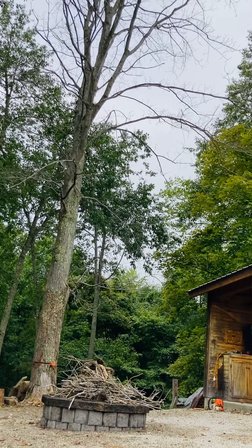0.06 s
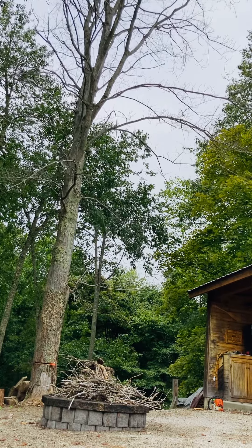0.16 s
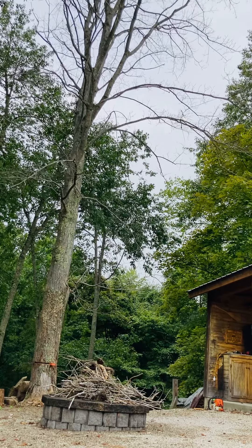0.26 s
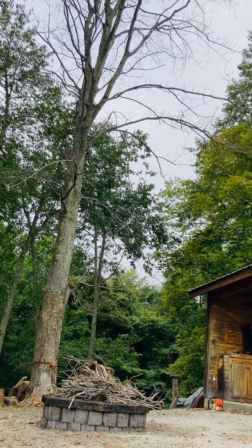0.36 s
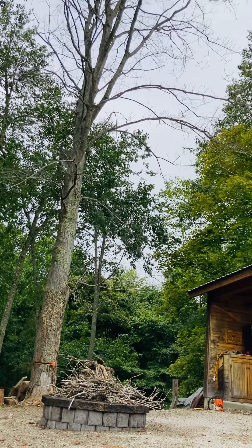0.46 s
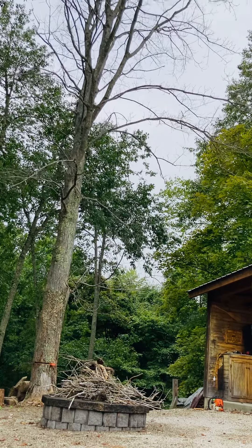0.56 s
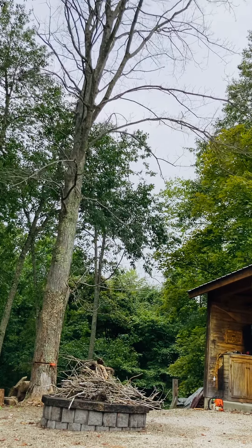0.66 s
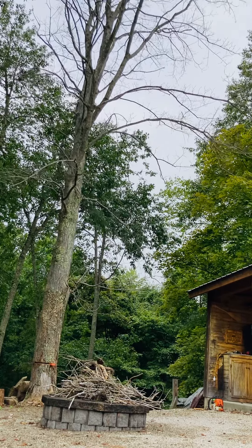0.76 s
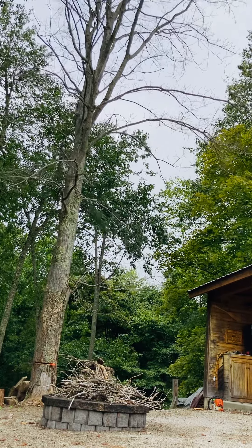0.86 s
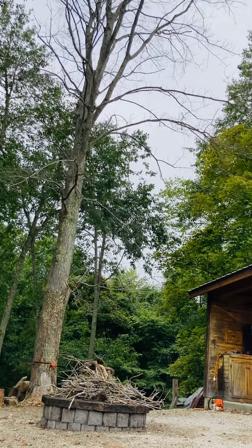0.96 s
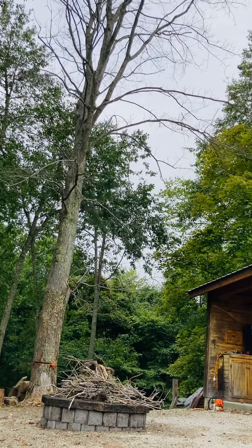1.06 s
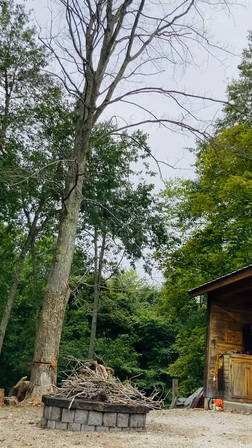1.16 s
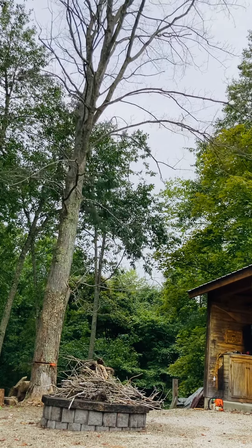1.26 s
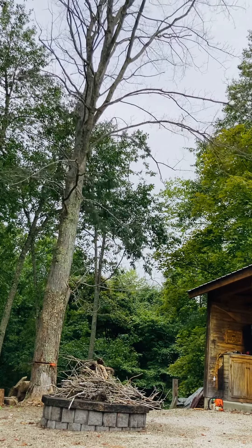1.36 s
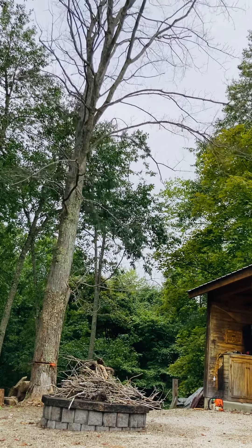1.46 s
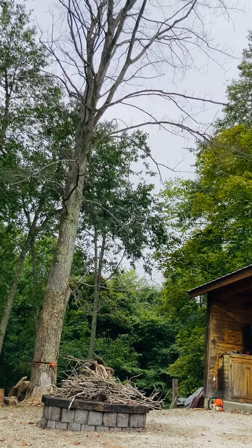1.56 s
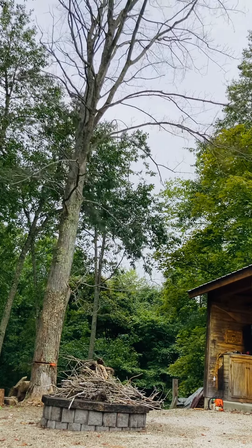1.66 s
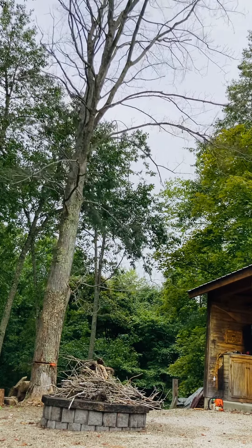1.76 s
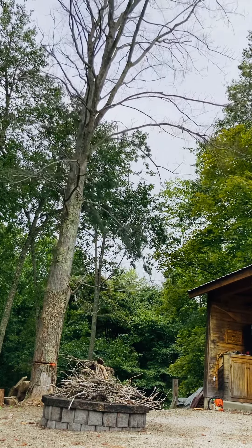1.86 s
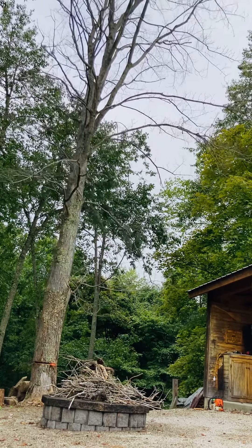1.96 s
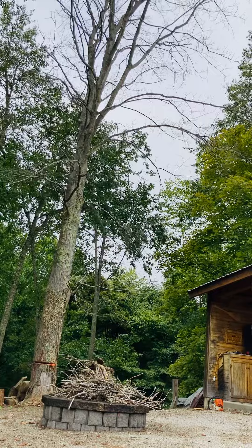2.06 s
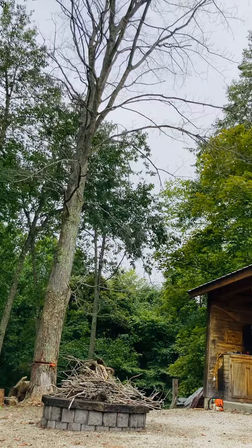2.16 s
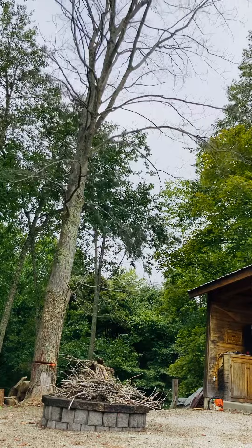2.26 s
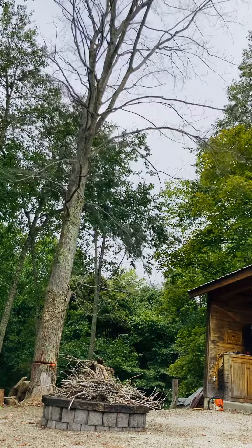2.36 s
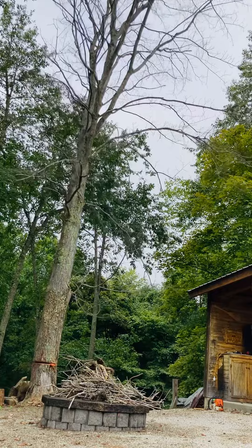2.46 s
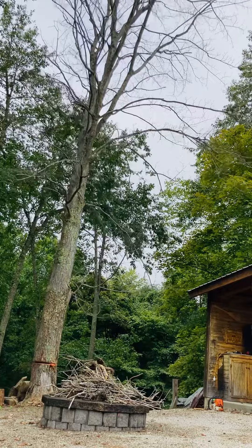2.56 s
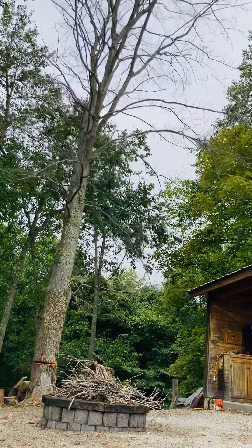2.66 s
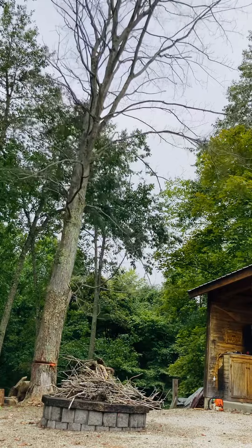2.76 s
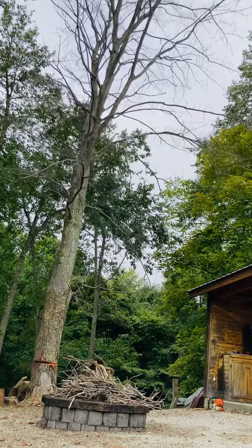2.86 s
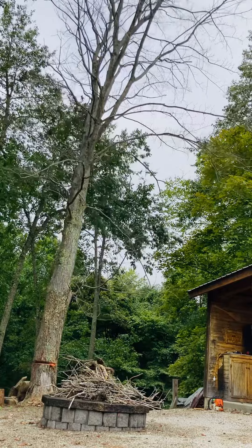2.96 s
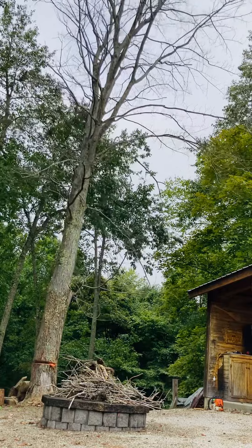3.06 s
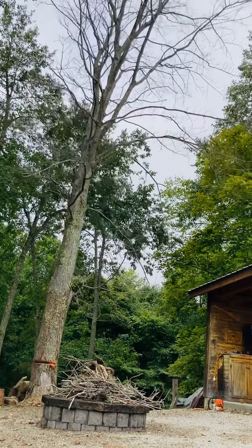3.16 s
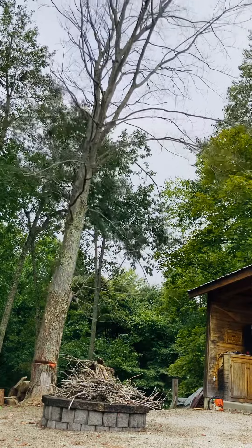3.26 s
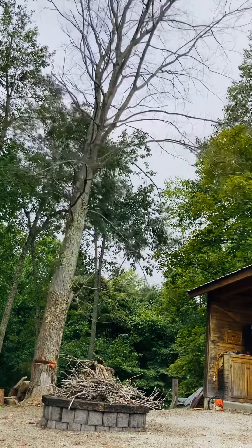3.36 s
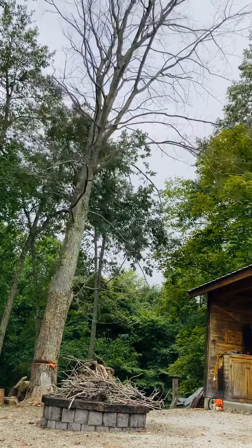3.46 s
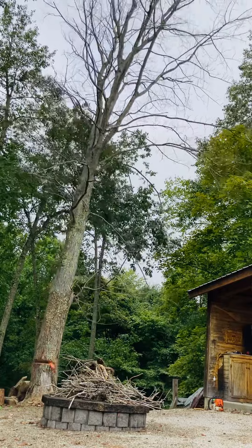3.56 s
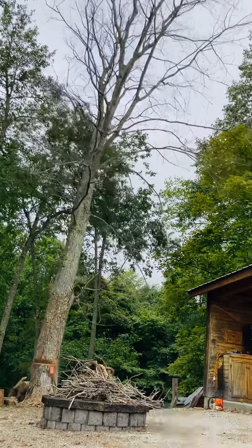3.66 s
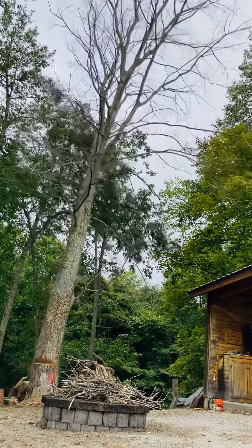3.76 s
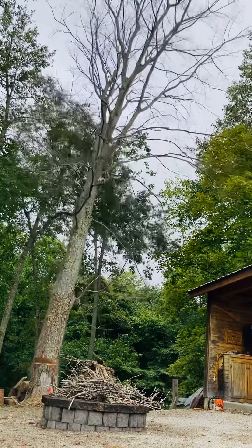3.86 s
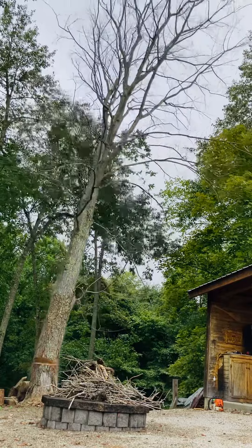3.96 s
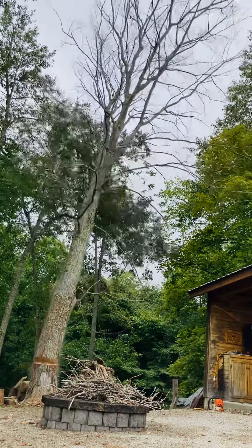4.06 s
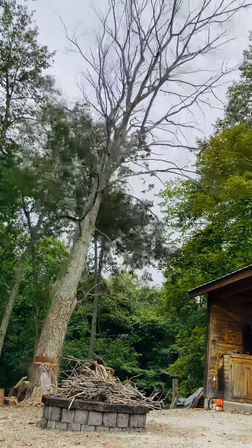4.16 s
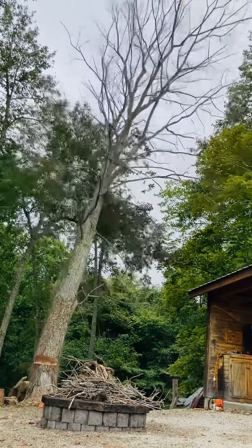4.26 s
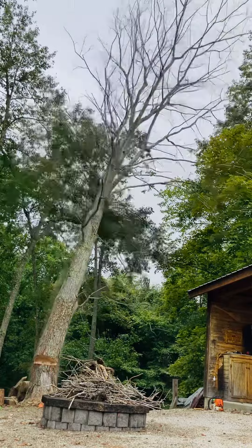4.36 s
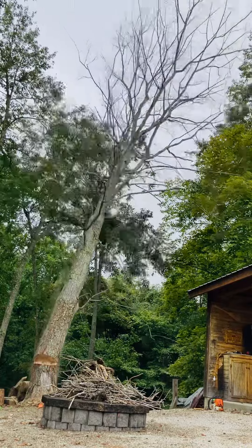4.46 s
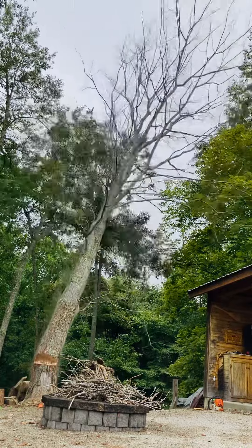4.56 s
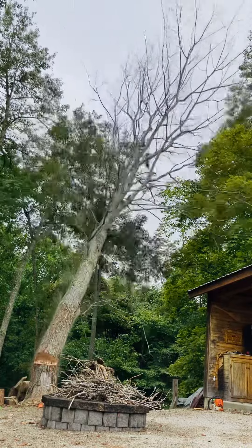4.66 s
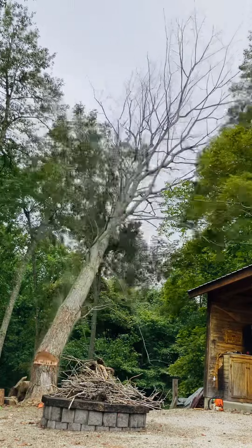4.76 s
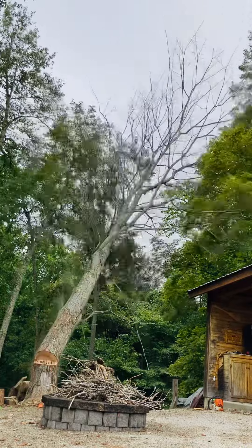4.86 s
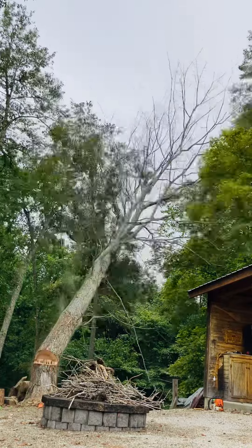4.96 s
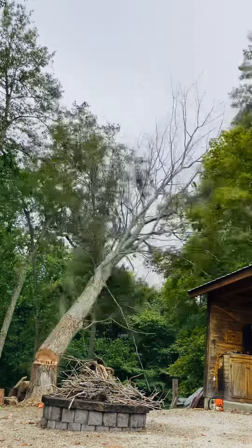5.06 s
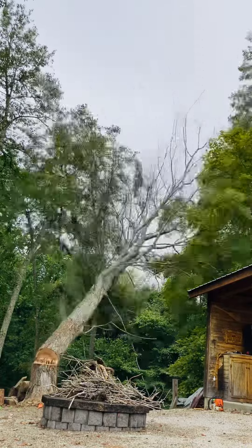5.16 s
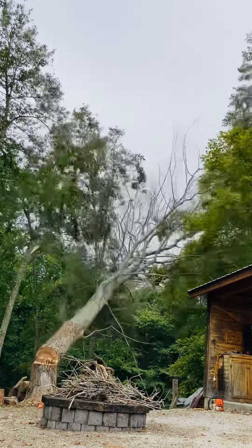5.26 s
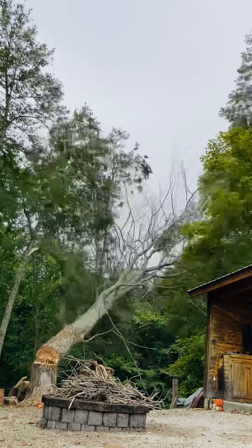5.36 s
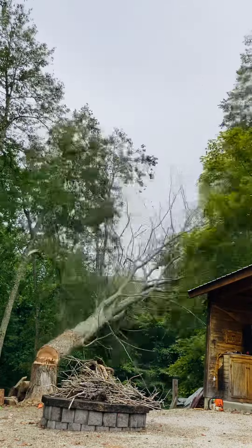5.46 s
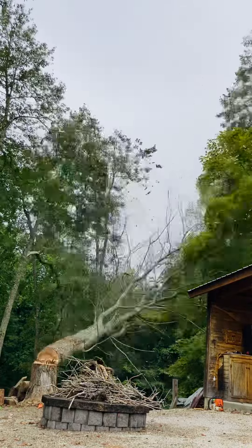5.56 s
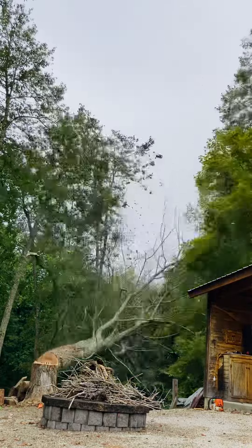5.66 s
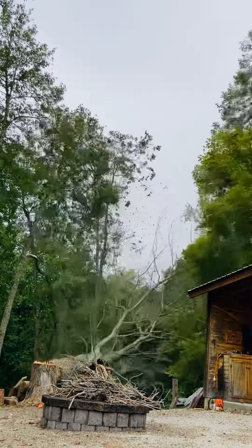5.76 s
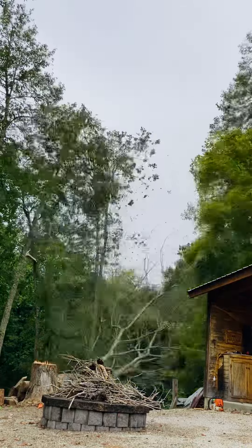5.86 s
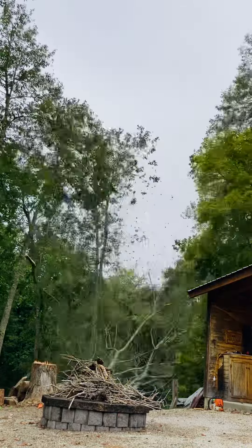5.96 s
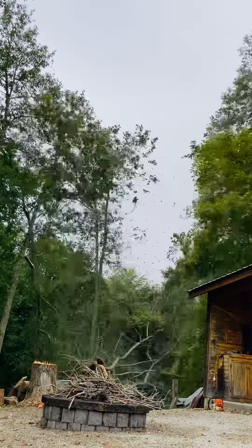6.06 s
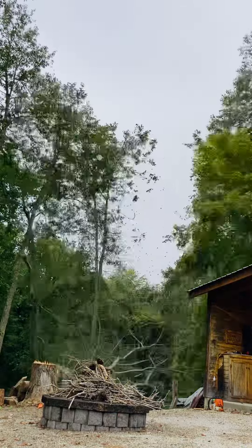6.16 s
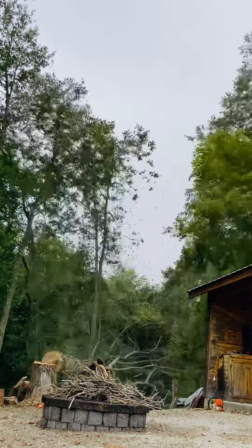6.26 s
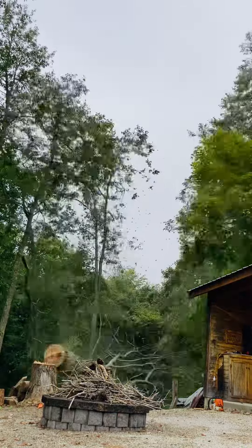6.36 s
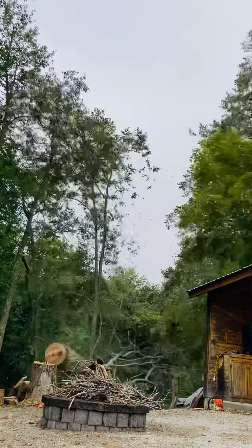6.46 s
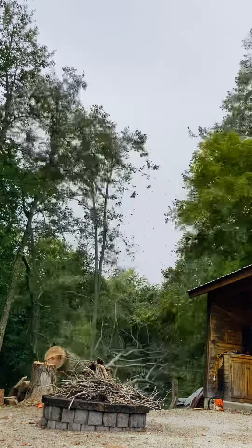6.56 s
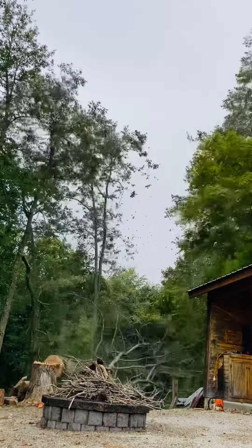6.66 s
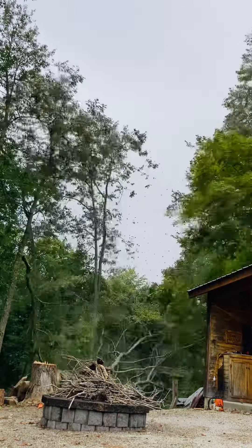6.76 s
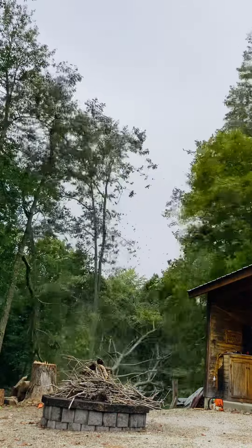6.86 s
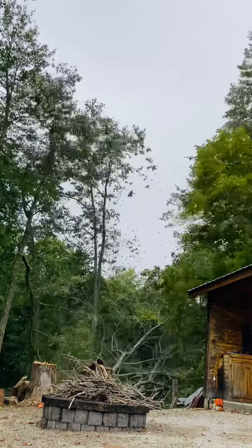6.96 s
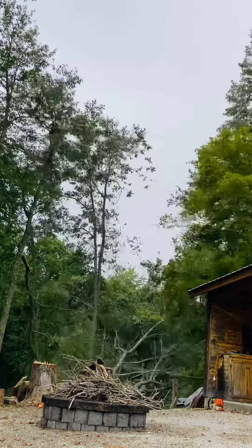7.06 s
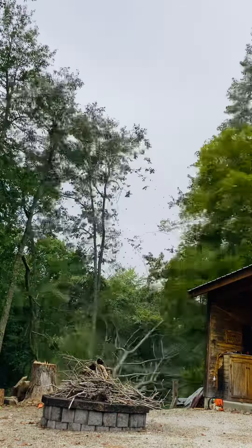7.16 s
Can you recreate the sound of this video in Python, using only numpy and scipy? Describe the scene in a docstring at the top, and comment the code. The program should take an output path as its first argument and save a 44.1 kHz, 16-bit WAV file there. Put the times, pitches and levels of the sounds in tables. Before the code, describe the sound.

Isolated fibre ticks give way to hard, ringing wood cracks and a short creak before the trunk lets go with a deep knock. Leaves patter, then roar while twigs and boughs snap and a limb groans. Clustered low thuds and soil crunch mark the landing, followed by fading rustle and a soft roll. Open forest clearing, distant idling engine, stereo microphone standing back, quick scattered woody echoes.

```python
"""A wooded clearing where a dead tree is felled, with an engine idling far off and insects in the leaves.
The hinge of wood ticks, cracks and tears: filtered impulses and short noise bursts, trailed by ringing tones.
The crown sweeps through its neighbours: hissing, pattering noise, ringing twigs, snapping branches, a scrape, a groan.
The trunk thuds, bounces and rolls: sine waves sinking in pitch, a low punch, crunching wood and a soil rumble.
A shed and the forest edge throw every crack back: short echoes and a scattered tail."""
import sys
import numpy as np
from scipy import signal
from scipy.fft import rfft, irfft
from scipy.io import wavfile
from scipy.ndimage import uniform_filter1d

SR = 44100
rng = np.random.default_rng(int(sys.argv[2]) if len(sys.argv) > 2 else 0)


def wav_out(sig):
    """Save sig, one row per channel (or a flat mono array), as 16-bit PCM at SR to the path in sys.argv[1]."""
    wavfile.write(sys.argv[1], SR, np.round(np.clip(np.atleast_2d(sig).T, -1, 1) * 32767).astype(np.int16))


N = 318402
TIME, HZ = np.arange(N) / SR, np.fft.rfftfreq(N, 1 / SR)


def amp(db):
    """Decibels to a linear gain."""
    return 10 ** (np.asarray(db) / 20)


def evened(x):
    """The signal scaled to an rms of 1."""
    return x / np.sqrt(np.mean(x ** 2) + 1e-20)


def read(points, hz):
    """A curve given as points, read at any pitch along a logarithmic axis."""
    point_hz, value = np.transpose(points)
    return np.interp(np.log(hz + 1), np.log(point_hz + 1), value)


def add(mix, s, sound):
    """Lay a sound into the mix from second s, cut off at the end."""
    part = mix[..., max(round(s * SR), 0):][..., :sound.shape[-1]]
    part += sound[..., :part.shape[-1]]


def drift(rate_hz):
    """Slow random movement of rms 1: noise with its fast changes removed."""
    return evened(irfft(rfft(rng.standard_normal(N)) * np.exp(-(HZ / rate_hz) ** 2), N))


def swell(start, hold, db, rise_db_per_s, fall_db_per_s):
    """Attack, hold and release as a gain over time, straight in dB."""
    before = np.maximum(start - TIME, 0)
    after = np.maximum(TIME - start - hold, 0)
    return amp(db - rise_db_per_s * before - fall_db_per_s * after)


def causal(spectrum, size=2048):
    """The frequency response of a body with this spectrum that rings only after it is struck."""
    log_gain = np.log(amp(read(spectrum, abs(np.fft.fftfreq(size, 1 / SR)))))
    return np.exp(np.conj(signal.hilbert(log_gain)))[:size // 2 + 1]


def colour(pair, spectrum):
    """Filter a pair through a body with this spectrum, then bring it to an rms of 1."""
    response = irfft(causal(spectrum, size=4096))
    return evened(signal.oaconvolve(pair, response[None], axes=1)[:, :N])


# Likeness of scattered sound at the two microphone ports.
# Each row: frequency in Hz, likeness from 0 (unrelated) to 1 (the same).
PORT_LIKENESS = [(100, 1), (400, 0.96), (900, 0.31), (1900, 0.62), (2600, 0.031), (4200, 0.194),
                 (5600, 0.62), (7200, 0.68), (8200, 1), (10000, 0.66), (11800, 1), (13200, 1), (15000, 0.4)]


def spread(pair):
    """Two unrelated signals turn into scattered sound, partly alike at the two ports."""
    angle = np.arcsin(np.clip(read(PORT_LIKENESS, HZ), 0, 1)) / 2
    z = rfft(pair)
    return irfft(np.cos(angle) * z + np.sin(angle) * z[::-1], N)


def clicks(per_s, range_db, cap, splinter_s=0.00042, count=6):
    """Random fractures, many small and a few large, each a tiny burst of one of several shapes."""
    size = amp(range_db * np.minimum(rng.exponential(1, (2, N)), cap))
    size *= rng.random((2, N)) < per_s / SR
    kind = rng.integers(0, count, (2, N))
    t = np.arange(256) / SR
    shapes = rng.standard_normal((count, 1, len(t))) * np.exp(-t / splinter_s)
    bursts = (signal.oaconvolve(size * (kind == k), shapes[k], axes=1)[:, :N] for k in range(count))
    return evened(sum(bursts))


def sticks(per_s, range_db, cap, cycles, low_hz, high_hz, count=28):
    """Dry sticks break at random; each rings for a few cycles at its own pitch, and a few are large."""
    out, t = np.zeros((2, N)), np.arange(1024) / SR
    for hz in np.geomspace(low_hz, high_hz, count):
        size = amp(range_db * np.minimum(rng.exponential(1, 256), cap))
        when = np.cumsum(rng.exponential(count / per_s, 256))
        side = rng.uniform(0, 2 * np.pi, 256)
        ping = np.sin(2 * np.pi * hz * t) * np.exp(-hz * t / cycles) * hz / high_hz
        for s, gain, angle in zip(when[when < TIME[-1]], size, side):
            add(out, s, gain * np.outer([np.cos(angle), np.sin(angle)], ping))
    return evened(out)


def scatter(start, end, per_s, spread_db, size=96):
    """Chance fractures at uneven intervals: rows of (s, wood dB, tick dB), the levels around 0."""
    when = start + np.cumsum(rng.exponential(1, size)) / per_s
    strengths_db = spread_db * rng.standard_normal((size, 2))
    return np.column_stack([when, strengths_db])[when < end]


def mottle(pair, depth_db, width_hz, life_s, size=512):
    """Short-lived resonances: now one pitch stands out, now another."""
    hz, t, z = signal.stft(pair, SR, nperseg=size, noverlap=size * 3 // 4)
    field = rng.standard_normal((len(t), len(hz))).T
    for axis, reach in enumerate([width_hz / hz[1], life_s / t[1]]):
        bell = np.exp(-(np.arange(-size // 16, size // 16 + 1) / reach) ** 2)
        field = signal.fftconvolve(field, np.expand_dims(bell, 1 - axis), "same")
    gain = evened(amp(depth_db * evened(field)))
    return signal.istft(z * gain, SR, nperseg=size, noverlap=size * 3 // 4)[1][:, :N]


# How long the forest's echo lasts.
# Each row: frequency in Hz, time to die by 60 dB in seconds.
FOREST_DECAY = [(100, 0.02), (500, 0.33), (1600, 0.37), (4000, 0.55), (9000, 0.33), (15000, 0.42)]


def forest(pair, count=4):
    """Trunks and leaves scatter the sound into a tail, each band dying at its own speed, by ever-changing paths."""
    taps = rng.standard_normal((count, 2, SR // 2)) * (rng.random((count, 2, SR // 2)) < 5000 / SR)
    hz, t, z = signal.stft(taps, SR, nperseg=256)
    dying = amp(-60 * t / read(FOREST_DECAY, hz)[:, None])
    tails = signal.istft(z * dying, SR, nperseg=256)[1]
    tails *= np.clip(np.arange(tails.shape[-1]) / SR / 0.0024, 0, 1) ** 2
    tails /= np.linalg.norm(tails, axis=-1, keepdims=True)
    # the sound is handed round the paths 11 times a second
    turn = 11 * TIME - np.arange(count)[:, None] / count
    paths = np.maximum(np.cos(2 * np.pi * turn), 0)
    return sum(signal.oaconvolve(pair * path, tail, axes=1)[:, :N] for path, tail in zip(paths, tails))


# Near reflections; of the sharp ticks, only the flat shed wall gives a strong return.
# Each row: delay in seconds, wood gain in dB, tick gain in dB.
NEAR_ECHOES = [(.0083, -10.5, -12.5), (.0099, -12.5, -28), (.0132, -10.5, -27), (.025, -20, -27),
               (.031, -19, -29)]


def reflected(wood, ticks):
    """The ground, the shed and near trunks return single echoes, whose delays wander by a few percent."""
    out = np.zeros((2, N))
    for delay, wood_db, tick_db in NEAR_ECHOES:
        path_s = delay * (1 + .03 * drift(6))
        heard_from = TIME - np.round(path_s * SR) / SR
        sent = amp(wood_db) * wood + amp(tick_db) * ticks
        out += np.array([np.interp(heard_from, TIME, x) for x in sent])
    return out


LEAD_IN_S = .004  # room for the first fibres before the main break


def snap(spectrum, db, tear_s, ragged, lag_s, vary=0.079, size=2048):
    """One break amid smaller fibres, at two ports; bending waves bring the treble first and the bass last."""
    t, hz = np.arange(size) / SR - LEAD_IN_S, np.fft.rfftfreq(size, 1 / SR)
    fibres = rng.standard_normal((2, size)) * np.exp(np.minimum(t / (0.44 * tear_s), -t / tear_s))
    # a few fibres are much thicker than the rest
    fibres *= amp(5 * np.repeat(rng.standard_normal(size // 16), 16))
    main_break = np.exp(-2j * np.pi * hz * LEAD_IN_S)
    force = main_break + ragged * rfft(fibres / np.linalg.norm(fibres, axis=1, keepdims=True))
    # each piece of wood rings at its own pitch
    thickness = np.exp(vary * rng.uniform(-0.84, 1))
    body = causal(np.array(spectrum) / [thickness, 1], size=size)
    bending = np.exp(-4j * np.pi * lag_s * np.sqrt(1000 * hz))
    wave = irfft(force * body * bending)
    # the level is the rms of each port over 5 ms, on average
    return amp(db) * wave / np.linalg.norm(wave) * np.sqrt(2 * .005 * SR)


WOOD_HZ = 1600  # where a crack of the hinge usually peaks


def pitched(spectrum, ratio, tilt_db):
    """The spectrum of a thinner or thicker piece of wood, tilted by so many dB an octave."""
    hz, db = np.transpose(spectrum)
    return np.column_stack([hz * ratio, db + tilt_db * np.log2(hz / WOOD_HZ)])


LET_GO_S = 3.72  # from here the tree falls freely


def falling(onset_s=0.032):
    """0 while the tree stands, 1 once it falls freely."""
    return np.clip((TIME - LET_GO_S) / onset_s + 1, 0, 1)


# The idling engine and its rattles.
# Each row: frequency in Hz, rms level in dB around which it wavers.
ENGINE_IDLE = [(41.2, -50.5), (88.5, -63.5), (123.5, -52), (135.5, -59), (206, -67.5), (247, -66),
               (275, -70), (331, -69.5)]
# The engine hum sinks for about two seconds during the fall, then recovers.
# One row: deepest from in seconds, for seconds, share of the hum lost in dB, onset and recovery in dB/s.
ENGINE_SINK = (4, 1.91, -4.5, 14, 14)
# Colours of the still air and of the insects.
# Each row: frequency in Hz, relative level in dB.
AIR_COLOUR = [(18, -37), (45, -20), (65, -1), (110, -6), (170, 1.5), (220, -5.5), (280, -6.5), (450, -16),
              (750, -22), (1500, -17), (2600, -22.5), (4200, -26), (6000, -41), (10000, -25), (13200, -26),
              (15700, -32)]
INSECT_COLOUR = [(3500, -26), (5500, -9), (7000, -4), (7600, -0.5), (8100, -5.5), (8800, -7.5),
                 (10000, -32)]


def clearing():
    """A far engine of wavering sines idles under still air and a thin, fluttering chorus of insects."""
    revolved_s = np.cumsum(1 + .003 * drift(3)) / SR
    idle = np.zeros(N)
    for hz, db in ENGINE_IDLE:
        level = np.sqrt(2) * amp(db + .3 * drift(4.6))
        idle += level * np.sin(2 * np.pi * (hz * revolved_s + rng.random()))
    idle *= 1 - np.minimum(swell(*ENGINE_SINK), 1)
    air = amp(-51.0) * colour(rng.standard_normal((2, N)), AIR_COLOUR)
    chorus = colour(rng.standard_normal((2, N)), INSECT_COLOUR)
    insects = amp(-52.5) * chorus * amp(1.5 * drift(53))
    return idle + spread(air + insects)


# The crown brushes two neighbours, hits the undergrowth and rebounds.
# Each row: full contact in seconds, hold in seconds, leaf level in dB, twig level in dB.
CROWN_BRUSHES = [(3.79, 0.04, -59, -43.5), (3.943, 0.081, -41.5, -41), (4.264, 0.55, -36.5, -46),
                 (4.868, 0.16, -33.5, -47.5), (5.133, 0.38, -26.5, -34), (5.49, 0.031, -27, -46),
                 (5.762, 0.37, -30, -41.5), (6.077, 0.17, -25.5, -38.5), (6.79, 0.018, -36.5, -52.5),
                 (6.992, 0.13, -35.5, -60.5)]
BRUSH_RISE_DB_PER_S, LEAF_FALL_DB_PER_S, TWIG_FALL_DB_PER_S = 64, 32, 49


def contact():
    """How hard the crown works on leaves and on twigs: the brushes add in power."""
    leaves, twigs = np.zeros((2, N))
    for s, hold, leaf_db, twig_db in CROWN_BRUSHES:
        leaves += swell(s, hold, leaf_db, BRUSH_RISE_DB_PER_S, LEAF_FALL_DB_PER_S) ** 2
        twigs += swell(s, hold, twig_db, BRUSH_RISE_DB_PER_S, TWIG_FALL_DB_PER_S) ** 2
    return falling() * np.sqrt([leaves, twigs])


# Once the crown is down, the undergrowth screens its highest hiss.
# One row: start in seconds, fade in seconds, final gain of the top in dB.
HISS_SCREEN = (5.85, .2, -3)
SCREEN_HZ = 11000


def screened(pair):
    """The top of the treble fades as the leaves sink behind the undergrowth."""
    start, over_s, db = HISS_SCREEN
    top = irfft(rfft(pair) / (1 + (SCREEN_HZ / (HZ + 1)) ** 10), N)
    return pair + top * (amp(db * np.clip((TIME - start) / over_s, 0, 1)) - 1)


# Colours of the leaves, the breaking twigs and the whoosh.
# Each row: frequency in Hz, relative level in dB.
LEAF_COLOUR = [(300, -19), (1200, -1.5), (2800, -1.5), (4600, -3.5), (6000, 0), (7400, -3), (8500, 1.5),
               (13000, -1.5), (14500, -3), (15700, -12), (16200, -41)]
TWIG_COLOUR = [(200, -28.5), (550, -11), (760, 1.5), (1100, 1.5), (1500, -1), (1950, 2), (2500, -13.5),
               (3600, -7.5), (5000, -39), (10000, -53), (15000, -50)]
WHOOSH_COLOUR = [(50, -35), (120, -7.5), (172, -2.5), (215, -5.5), (300, -17.5), (700, -43.5)]
# The bare crown whooshing through the air.
# One row: full from in seconds, for seconds, level in dB, rise in dB/s, fall in dB/s.
CROWN_WHOOSH = (4.5, 1.9, -47.5, 3, 36)
# single leaves stand out at first, then merge into a rush (dB against the hiss)
PATTER_FIRST_DB, PATTER_MERGE_DB_PER_S, PATTER_LAST_DB = 19, 23, -5.5


def crown(leaf_gain, twig_gain):
    """Leaves hiss and patter while twigs break in clumps and bare limbs whoosh."""
    hiss = colour(rng.standard_normal((2, N)), LEAF_COLOUR) * amp(0.63 * drift(51))
    taps = colour(clicks(per_s=900, range_db=2.0, cap=2.8, splinter_s=0.00023), LEAF_COLOUR)
    patter = taps * evened(amp(4.9 * drift(62.6)))
    merging_db = PATTER_FIRST_DB - PATTER_MERGE_DB_PER_S * (TIME - LET_GO_S)
    single = amp(np.maximum(merging_db, PATTER_LAST_DB))
    leaves = (hiss + single * patter) / np.sqrt(1 + single ** 2)
    breaking = sticks(per_s=330, range_db=4.5, cap=2.9, cycles=4.5, low_hz=520, high_hz=3700)
    twigs = colour(breaking, TWIG_COLOUR) * evened(amp(2.3 * drift(52)))
    near = leaf_gain * screened(leaves) + twig_gain * twigs
    rush = mottle(near + amp(-2.5) * forest(near), depth_db=1.7, width_hz=124, life_s=0.018)
    whoosh = falling() * swell(*CROWN_WHOOSH) * colour(rng.standard_normal((2, N)), WHOOSH_COLOUR)
    return spread(rush + whoosh)


# Limbs dragging through the neighbouring trees.
# One row: full from in seconds, for seconds, level in dB, rise in dB/s, fall in dB/s.
SCRAPE_SWELL = (4, 2.5, -41, 200, 40)
# Its colour. Each row: frequency in Hz, relative level in dB.
SCRAPE_COLOUR = [(150, -18), (400, 2.5), (650, 3.5), (950, -10.5), (1600, -1), (2300, -9), (3200, 4),
                 (4500, -7), (6200, -11), (9000, 0.5), (14000, -14), (16500, -40)]


def scraping():
    """Limbs drag through the neighbouring trees, stripping bark and stems in quick uneven spurts."""
    spurts = evened(amp(2.4 * drift(60)))
    splinters = clicks(per_s=300, range_db=5, cap=2.9, splinter_s=.0005)
    grains = colour(splinters, SCRAPE_COLOUR) * spurts
    dragged = falling() * swell(*SCRAPE_SWELL) * grains
    return spread(mottle(dragged, depth_db=1.6, width_hz=150, life_s=0.014))


# A leaning limb judders along another; with a negative hold the fall begins before the rise ends.
# One row: rise ends in seconds, hold in seconds, level in dB without that overlap, rise and fall in dB/s.
GROAN_SWELL = (5.5, -0.07, -31, 150, 60)
GROAN_HZ, GROAN_WANDER, GROAN_WIDTH_HZ = 843, 0.05, 110  # the wander is a share of the pitch


def groan():
    """Uneven slips of one limb on another ring a resonance that wanders as the contact slides."""
    slips = clicks(per_s=260, range_db=5, cap=2.5)
    wandering_hz = GROAN_HZ * (1 + GROAN_WANDER * drift(10))
    turn = np.exp(2j * np.pi * np.cumsum(wandering_hz) / SR)
    # shift the moving resonance down to 0 Hz, filter there and shift it back
    rung = turn * signal.lfilter(*signal.butter(2, GROAN_WIDTH_HZ / 2, fs=SR), slips / turn)
    return spread(swell(*GROAN_SWELL) * evened(rung.real))


# The larger branches breaking in the crown.
# Each row: start in seconds, wood crack level in dB, splinter tick level in dB,
# decay of the wood's tearing in seconds, brightness in dB per octave.
BRANCH_BREAKS = [(3.7465, -36, -39, .004, -4), (3.804, -34, -32, .005, -1), (3.821, -37, -37, 0.0044, 4),
                 (3.8992, -35, -33, 0.0086, 1), (3.9187, -35, -24.5, .006, 4), (3.9275, -31, -26, .004, -1),
                 (3.9655, -29.5, -29, 0.0052, 2), (3.9822, -37, -26.5, .004, 4.5),
                 (4.0175, -37, -38, .004, 2), (4.0262, -35, -26.5, .011, 5),
                 (4.0705, -26.5, -24, 0.0039, 0), (4.094, -28.5, -22.5, .0054, 4),
                 (4.1035, -38, -26, 0.0077, -2), (4.1375, -38, -35, .004, 2), (4.143, -35, -30, .007, 2),
                 (4.2, -46, -41, .004, -3), (4.2186, -28.5, -33, 0.0036, 3.5), (4.235, -42, -28, 0.0055, 0),
                 (4.2435, -34, -26.5, .005, 0.5), (4.2948, -49, -30, 0.004, -2),
                 (4.303, -45, -29, 0.0031, 3), (4.3222, -38, -27, 0.0068, -1),
                 (4.388, -30, -30, .008, -1.5), (4.3986, -30, -23.5, 0.0071, 1.5),
                 (4.4688, -30.5, -40, 0.0051, -3.5), (4.5093, -39, -32, 0.0053, 1),
                 (4.5336, -31.5, -35, .006, -1.5), (4.557, -37, -26.5, 0.0073, -1),
                 (4.9045, -18, -19, 0.0077, 3), (4.9096, -29, -19.5, 0.006, 4),
                 (5.033, -19.5, -40.5, 0.0069, -1.5), (5.1039, -21.5, -37.5, 0.0088, -1.5),
                 (5.1261, -23, -33.5, .0049, -1), (5.1507, -16, -33.5, 0.007, -2.5),
                 (5.175, -25, -33, .007, 1), (5.185, -21.5, -32, 0.0062, -0.5),
                 (5.196, -25, -40, .005, -2.5), (5.2326, -24, -34, .0087, -4), (5.2925, -30, -38, .0037, 1),
                 (5.3055, -16.5, -20, 0.011, 0.5), (5.338, -23, -19, .0052, 0),
                 (5.352, -19.5, -23, .007, -2), (5.3752, -16, -25, 0.0036, 0),
                 (5.385, -21, -32, 0.0042, -3.5), (5.4105, -18.5, -24, 0.0022, 5),
                 (5.4135, -15.5, -22, 0.0022, 5), (5.447, -32, -33, .005, -2),
                 (5.4861, -18.5, -16.5, 0.022, 3), (5.5301, -18.5, -14, .0083, -1),
                 (5.5365, -23, -31, .005, 1), (5.5497, -26, -18, .0083, 0), (5.5655, -19.5, -15, 0.0092, 0),
                 (5.579, -27, -30, .006, -6), (5.592, -27, -28, 0.0056, -5),
                 (5.6135, -22, -21.5, 0.0096, 6), (5.6415, -28.5, -22.5, 0.0071, 3),
                 (5.6845, -33, -28, .0041, 1), (5.7035, -27, -27, .006, 0),
                 (5.7215, -22.5, -22.5, .0103, -0.5), (5.7541, -26, -22, .007, -1),
                 (5.829, -28, -40, 0.0046, -5), (5.841, -23.5, -38, 0.0066, -3),
                 (6.0406, -29, -25, .0064, -1), (6.081, -27.5, -29, .0093, 7),
                 (6.1598, -42, -22, .0025, -1), (6.213, -29, -23, .005, 7), (6.2753, -26, -16.5, .017, 6),
                 (6.5165, -42, -20, .012, 4), (6.5254, -29.5, -16.5, 0.023, 3.5)]
# What a breaking bough and its splinters ring with; the splinters serve the hinge too.
# Each row: frequency in Hz, relative level in dB.
BOUGH_COLOUR = [(200, -25.5), (520, -14), (740, 2), (900, -1.5), (1120, 3.5), (1500, -3.5), (1950, 3),
                (2500, -8.5), (3500, -2.5), (5000, -28.5), (10000, -52)]
SPLINTER_COLOUR = [(900, -60), (3000, -8), (5500, 2.5), (7000, -2), (8600, 3.5), (10500, 5), (13000, 1.5),
                   (15000, -10), (17000, -55)]
# small branches snap at random, as hard as the crown presses on twigs and leaves (levels in dB against those)
SNAPS_PER_S, SNAPS_END_S, SNAP_WOOD_DB, SNAP_TICK_DB, SNAP_SPREAD_DB = 24, 5.8, 3, 0, -1
SNAP_TEAR_S = 0.004


def branches(leaf_gain, twig_gain):
    """Dead limbs break off in the crown, some dull and some bright, with small ones in between."""
    (wood, ticks), breaks = np.zeros((2, 2, N)), list(BRANCH_BREAKS)
    for s, wood_db, tick_db in scatter(LET_GO_S, SNAPS_END_S, SNAPS_PER_S, SNAP_SPREAD_DB):
        twig_db = 20 * np.log10(np.interp(s, TIME, twig_gain))
        leaf_db = 20 * np.log10(np.interp(s, TIME, leaf_gain))
        small_wood_db = twig_db + SNAP_WOOD_DB + wood_db
        small_tick_db = leaf_db + SNAP_TICK_DB + tick_db
        breaks.append((s, small_wood_db, small_tick_db, SNAP_TEAR_S, 0))
    for s, wood_db, tick_db, tear_s, tilt_db in breaks:
        bough = pitched(BOUGH_COLOUR, 0.99, tilt_db)
        crack = snap(bough, wood_db, tear_s=tear_s, ragged=2.16, lag_s=.0004, vary=0.087)
        tick = snap(SPLINTER_COLOUR, tick_db, tear_s=.42 * tear_s, ragged=1.6, lag_s=0.000323)
        add(wood, s - LEAD_IN_S, crack)
        add(ticks, s - LEAD_IN_S, tick)
    direct = wood + ticks
    near = amp(-4) * reflected(wood, ticks)
    return spread(direct + near + amp(-6.5) * forest(direct))


# Blows of the trunk and its heavy limbs.
# Each row: start in seconds, strength in dB (wave and punch are played below it), first pitch in Hz,
# pitch it sinks towards in Hz, rise in seconds, time to die by 60 dB in seconds, crunch level in dB.
TRUNK_BLOWS = [(2.599, -25, 559, 288, 0.00064, 0.068, -34.5), (3.5949, -9, 720, 45, .0006, 0.064, -18.5),
               (3.805, -33, 329, 140, .00066, 0.093, -42), (4.903, -24, 260, 165, 0.0012, 0.09, -38),
               (5.636, -29, 455, 304, .0007, 0.07, -33), (6.029, -23, 520, 200, .001, .03, -27),
               (6.0364, -14, 470, 60, 0.0028, 0.046, -20.5), (6.0462, -11, 300, 110, 0.0011, 0.061, -25),
               (6.0629, -9.5, 394, 35, 0.0034, 0.044, -27), (6.127, -19, 300, 95, 0.0036, .08, -27.5),
               (6.1347, -21, 380, 110, .001, 0.046, -35), (6.2, -22, 300, 110, .003, 0.074, -31),
               (6.244, -27, 425, 172, .002, .06, -36), (6.8, -27, 634, 110, .00125, 0.054, -28),
               (6.9093, -19.5, 420, 43.7, .005, 0.25, -34.5), (6.956, -23, 131, 37.7, .003, 0.62, -31.5)]
# Limbs plough into the soil as the crown and trunk land, settle and roll.
# Each row: full from in seconds, hold in seconds, soil rumble level in dB, wood crunch level in dB.
SOIL_PLOUGHS = [(5.966, 0.03, -33.5, -33), (6.036, 0.036, -28, -35), (6.113, 0.024, -31, -33),
                (6.172, 0.025, -35, -37), (6.235, 0.043, -35.5, -38.5), (6.415, 0.079, -40, -44.5),
                (6.784, 0.042, -44.5, -47), (6.988, 0.11, -42.5, -53), (7.135, 0.028, -44, -53)]
PLOUGH_RISE_DB_PER_S, PLOUGH_FALL_DB_PER_S = 349, 166
# Colours of the low punch, the soil, and wood crushed against it.
# Each row: frequency in Hz, relative level in dB.
PUNCH_COLOUR = [(18, -17.5), (45, -1.5), (110, 3), (250, -4), (600, -50), (3000, -86.5)]
SOIL_COLOUR = [(20, -5), (55, 0.5), (110, 2.5), (180, -0.5), (300, 2), (480, -6.5), (750, -26), (1600, -13),
               (6000, -69)]
CRUNCH_COLOUR = [(30, -44), (100, -20), (250, 1), (400, -4.5), (540, -2.5), (700, -14.5), (1500, -27),
                 (5000, -73)]
LIMB_RUMBLE_DB = -6.5  # bending limbs rumble in step with the breaking twigs, against their level


def ground(twig_gain):
    """Limbs plough the soil; each trunk blow crunches, punches and sends out a wave that sinks in pitch."""
    t, blows = np.arange(SR // 2) / SR, np.zeros((2, N))
    for s, db, first_hz, last_hz, rise_s, t60, crunch_db in TRUNK_BLOWS:
        hz = last_hz + (first_hz - last_hz) / (1 + t / 0.002)  # the soil carries high pitches fastest
        wave = np.sin(2 * np.pi * np.cumsum(hz) / SR) * (1 - np.exp(-t / rise_s))
        add(blows, s, amp(db - 4.5 - 60 * t / t60) * wave)
        punch = snap(PUNCH_COLOUR, db - 14.5, tear_s=0.0088, ragged=0.13, lag_s=0.00062, size=4096)
        add(blows, s - LEAD_IN_S, punch[0])  # long waves are the same at both ports
        crushed = snap(CRUNCH_COLOUR, crunch_db, tear_s=0.0034, ragged=2.3, lag_s=0.00094)
        add(blows, s - LEAD_IN_S, crushed)
    rumble = colour(clicks(per_s=700, range_db=1.5, cap=3.16), SOIL_COLOUR) * amp(1.7 * drift(22))
    breaking = sticks(per_s=600, range_db=3.0, cap=3.4, cycles=2.82, low_hz=220.3, high_hz=685.0)
    crunch = colour(breaking, CRUNCH_COLOUR)
    soil, wood = np.zeros((2, N))  # powers
    for s, hold, soil_db, wood_db in SOIL_PLOUGHS:
        soil += swell(s, hold, soil_db, PLOUGH_RISE_DB_PER_S, PLOUGH_FALL_DB_PER_S) ** 2
        wood += swell(s, hold, wood_db, PLOUGH_RISE_DB_PER_S, PLOUGH_FALL_DB_PER_S) ** 2
    strain = np.sqrt(soil + (amp(LIMB_RUMBLE_DB) * twig_gain) ** 2)
    return spread(blows + strain * rumble + np.sqrt(wood) * crunch + amp(-11.5) * forest(blows))


SLIP_WOBBLE = .1  # how unevenly the wood slips, as a share of the pitch


def creak(length, hz, db, swell_db):
    """Fast uneven slips that grow until the wood lets go."""
    t = np.arange(int(length * SR)) / SR
    wobble = evened(uniform_filter1d(rng.standard_normal(len(t)), 30))
    slips = np.sin(2 * np.pi * np.cumsum(hz * (1 + SLIP_WOBBLE * wobble)) / SR)
    grip = evened(amp(2 * evened(uniform_filter1d(rng.standard_normal(len(t)), 40))))
    growth = amp(db + swell_db * (t / length - 1))
    return np.sqrt(2) * slips * grip * growth * signal.windows.tukey(len(t), .15)


# Ringing tones after every knock and crack of the hinge, the lower ones about 100 Hz apart as from a close echo.
# Each row: frequency in Hz, gain at the peak in dB before the mix, time to die by 60 dB in seconds.
RINGING_TONES = [(392, -10, 0.11), (510, -12, 0.065), (593, -20, 0.053), (720, -8, 0.064), (812, 1, 0.13),
                 (1190, -7, 0.033), (1434, -11, 0.08), (1615, -1, 0.023), (1850, -10, 0.031),
                 (2560, -18, 0.06), (3280, 2, 0.028)]


def ring(pair):
    """Ringing tones set off by the sound, each a dying cosine with its own gain at its peak."""
    t = np.arange(SR // 8) / SR
    response = np.zeros(len(t))
    for hz, db, t60 in RINGING_TONES:
        rate = np.log(1000) / t60
        response += amp(db) * 2 * rate / SR * np.exp(-rate * t) * np.cos(2 * np.pi * hz * t)
    return signal.oaconvolve(pair, response[None], axes=1)[:, :N]


# The louder fibres of the hinge breaking.
# Each row: start in seconds, trunk knock, wood crack and splinter tick level in dB before the mix,
# pitch of the crack in Hz, its brightness in dB per octave, decay of the crack's tearing in seconds.
HINGE_FIBRES = [(0.058, -50, -34.5, -34, 1580, 6.5, 0.0042), (0.881, -73, -60, -44, 1594, -0.5, 0.0022),
                (0.9485, -68, -51, -38, 1610, 8, .002), (1.1317, -66.5, -57, -43.5, 1604, 0.5, 0.00205),
                (1.4287, -70.5, -55, -39.5, 1590, 0, 0.0023), (1.7108, -70, -51, -44, 1620, -2, 0.00206),
                (1.758, -69, -60, -37, 1600, -0.5, 0.0021), (1.7727, -46, -31.5, -20, 1760, 1, 0.0029),
                (1.875, -75, -44.5, -32.5, 1596, 4.5, 0.0019), (2.2837, -38.5, -27.5, -22, 1730, 3, 0.0052),
                (2.3208, -61.5, -37.5, -25.5, 1700, 4, 0.0032), (2.406, -65, -56.5, -43, 1600, 0.5, .002),
                (2.4986, -65, -42, -41, 1630, 0, 0.0051), (2.5064, -67, -37, -36, 1640, 5.5, 0.0019),
                (2.5695, -70, -59, -36.5, 1580, -1, 0.0021), (2.6515, -31.5, -19, -20.5, 1850, 0.5, 0.0028),
                (2.7355, -60, -41, -40, 1800, 2, .003), (2.7723, -40.5, -28.5, -22, 1597, 2, 0.0029),
                (2.7943, -33, -15.5, -16, 1640, 1.5, 0.0042), (2.8022, -20, -15.5, -21, 1394, 1, 0.0054),
                (2.8727, -28.5, -20, -20.5, 1623, -2.5, 0.0039), (2.9028, -37.5, -47, -22, 1600, 1, 0.0033),
                (3.0645, -18.5, -16, -22.5, 1580, 0, 0.0059), (3.0873, -19.5, -16, -21, 1500, -1, 0.0035),
                (3.1508, -60, -42, -35, 1600, 1, .002), (3.2035, -65, -50, -36, 1600, 1, .002),
                (3.2356, -18.5, -15.5, -17, 1458, 0, 0.0029), (3.261, -50, -33, -29, 1700, 4, 0.0022),
                (3.3004, -25.5, -19, -21.5, 1530, 0, 0.0035), (3.3425, -57, -26.5, -26.5, 1900, 4, 0.0039),
                (3.3492, -33, -29, -29, 1300, 2, 0.0028), (3.359, -55, -40, -35, 1600, -3, .002),
                (3.3896, -20.5, -15.5, -18, 1595, 1.5, 0.0027), (3.4173, -24.5, -18, -27, 1740, -1, 0.0018),
                (3.453, -31, -19, -18.5, 1880, 0.5, 0.004), (3.5127, -42, -28, -31, 1690, 3, .003),
                (3.5188, -14.5, -14, -23, 1550, 1.5, 0.0045), (3.5411, -16, -15.5, -25, 1400, 0, 0.0025),
                (3.5928, -38, -19, -22.5, 1560, -2.5, 0.0058), (3.7251, -55, -40, -38, 1498, -4, 0.004),
                (3.761, -45.5, -31.5, -40, 1470, -2.5, 0.004), (3.795, -42.5, -24, -26.5, 1500, 2, 0.0082)]
# Wood slipping on wood until it lets go.
# Each row: start in seconds, length in seconds, pitch in Hz, level it grows to in dB, swell in dB.
HINGE_CREAKS = [(2.786, .0125, 1787, -27.5, 14), (3.051, 0.021, 1632, -22, 15),
                (3.58, .0175, 1580, -11.5, 15.5)]
# Colours of the trunk knock and the wood crack.
# Each row: frequency in Hz, relative level in dB.
KNOCK_COLOUR = [(40, -29), (150, -13), (320, -9), (450, -0.5), (570, -1), (750, -7), (900, -23.5),
                (1150, -5), (2500, -40), (9000, -102)]
WOOD_COLOUR = [(250, -15.5), (700, -13), (900, -7), (1150, -0.5), (1350, -2.5), (1600, 1.5), (1900, -2),
               (2400, -5.5), (3300, -7), (4500, -12), (9000, -18), (15000, -72)]
# Tearing wood swells up to 3 s, stays even for a second, on into the fall, then stops quickly.
# One row: full from in seconds, for seconds, level in dB before it is mottled, rise and fall in dB/s.
WOOD_TEARING = (3, 1, -44.5, 31, 231.5)
# faint ticks of the straining hinge; the wood level is against the tick
STRAIN_PER_S, STRAIN_DB, STRAIN_SPREAD_DB, STRAIN_GROWTH_DB_PER_S, STRAIN_WOOD_DB = 6, -54.5, 5, 4, -25


def hinge():
    """Fibres part one by one: each ticks, cracks at its own pitch and knocks the trunk, more or less hard."""
    knocks, cracks, ticks, creaks = np.zeros((4, 2, N))
    for s, knock_db, wood_db, tick_db, hz, tilt_db, tear_s in HINGE_FIBRES:
        start = s - LEAD_IN_S
        wood = pitched(WOOD_COLOUR, hz / WOOD_HZ, tilt_db)
        knock = snap(KNOCK_COLOUR, knock_db, tear_s=0.0011, ragged=0.74, lag_s=0.001696)
        crack = snap(wood, wood_db, tear_s=tear_s, ragged=1.23, lag_s=0.001499, vary=.02)
        tick = snap(SPLINTER_COLOUR, tick_db, tear_s=0.44 * tear_s, ragged=0.73, lag_s=0.000541)
        # started early, as the bending waves lag
        add(knocks, start - .0012, knock)
        add(cracks, start - .0012, crack)
        add(ticks, start - .0002, tick)
    for s, wood_db, tick_db in scatter(0, LET_GO_S, STRAIN_PER_S, STRAIN_SPREAD_DB):
        strain_db = STRAIN_DB + STRAIN_GROWTH_DB_PER_S * s
        faint_db = strain_db + STRAIN_WOOD_DB + wood_db
        add(cracks, s, snap(WOOD_COLOUR, faint_db, tear_s=.0037, ragged=.98, lag_s=0.00095))
        add(ticks, s, snap(SPLINTER_COLOUR, strain_db + tick_db, tear_s=0.002, ragged=0.62, lag_s=0.00037))
    for s, *shape in HINGE_CREAKS:
        add(creaks, s, creak(*shape))
    rung = amp(-1.5) * (knocks + cracks) + amp(-2.5) * ring(knocks + cracks)
    thrown = cracks + amp(-3.5) * knocks  # the soft ground swallows some of the knock on its way to the trees
    strands = clicks(per_s=900, range_db=3.5, cap=3)
    tearing = swell(*WOOD_TEARING) * colour(strands, WOOD_COLOUR)
    echo = forest(amp(-4.5) * thrown + amp(-23) * creaks)
    tail = mottle(echo + tearing, depth_db=2.0, width_hz=110, life_s=0.0093)
    near = reflected(thrown, ticks)
    return spread(rung + ticks + creaks + near + tail + amp(-9.0) * forest(ticks))


def scene():
    """The clearing, the falling crown, the ground and the breaking hinge together."""
    leaf_gain, twig_gain = contact()
    sweep = crown(leaf_gain, twig_gain) + scraping() + groan() + branches(leaf_gain, twig_gain)
    return clearing() + sweep + ground(twig_gain) + hinge()


# Colour of the two microphone ports. Each row: frequency in Hz, left minus right in dB above the deep lows.
PORT_COLOUR = [(140, 0), (300, -1.5), (540, -6), (900, -1), (1600, -1), (2200, -3.5), (2750, 1.5),
               (3700, -1), (6000, 0.5), (15000, 0)]
# Lateness of the right port. Each row: frequency in Hz, radians by which the left leads.
PORT_LEAD = [(1, 0), (450, -.35), (900, .6), (1600, .3), (2700, 1.4), (3900, 1.4), (5000, 3.1), (6200, 3.6),
             (7700, 6.1), (9200, 6.4), (11200, 9.1), (12300, 9.6), (14000, 12.4), (16500, 12.6)]
CEILING, EDGE_HZ = 1.05, 16300  # the level towards which peaks are rounded; the band limit


def record(dry):
    """The ports differ in colour and phase; loud peaks are rounded; then the band limit."""
    # the difference in colour fades out in the deep lows, which reach both ports equally
    side_db = read(PORT_COLOUR, HZ) * (1 - np.exp(-(HZ / 170) ** 2))
    left, right = rfft(dry) * amp(np.array([[1], [-1]]) * side_db / 2)
    late_right = right * np.exp(-1j * read(PORT_LEAD, HZ))
    ports = irfft(np.array([left, late_right]), N)
    rounded = CEILING * np.tanh(ports / CEILING)
    band_limit = signal.firwin(255, EDGE_HZ, window=("kaiser", 9), fs=SR)
    return signal.oaconvolve(rounded, band_limit[None], "same")


dry = scene()
out = record(dry)
wav_out(out)
```